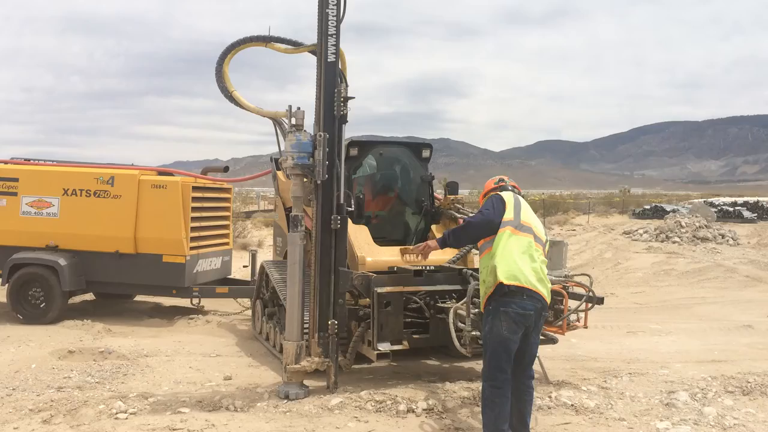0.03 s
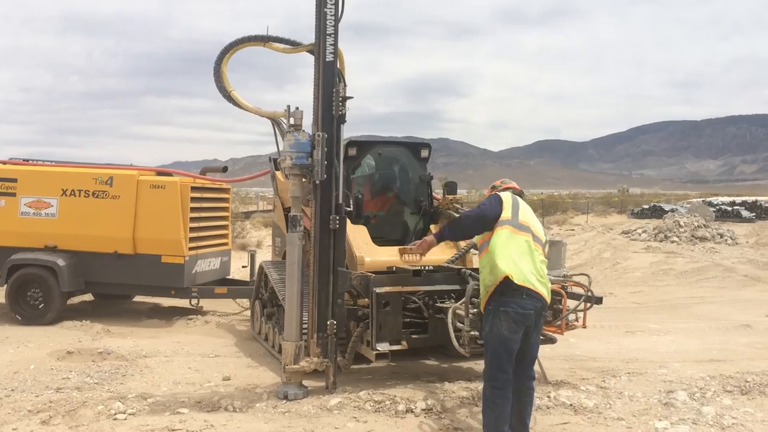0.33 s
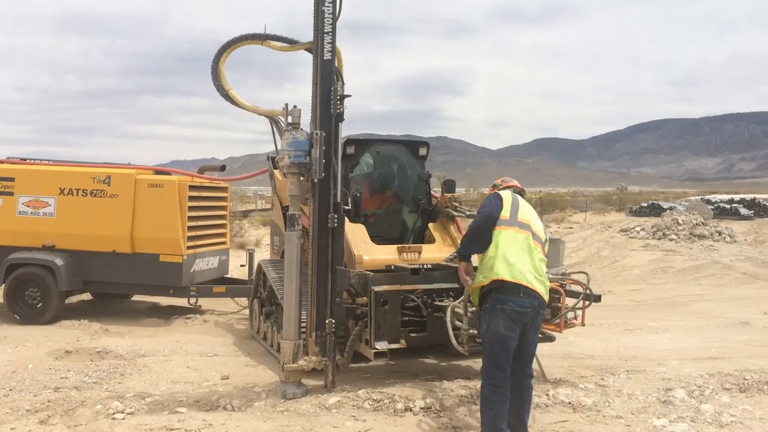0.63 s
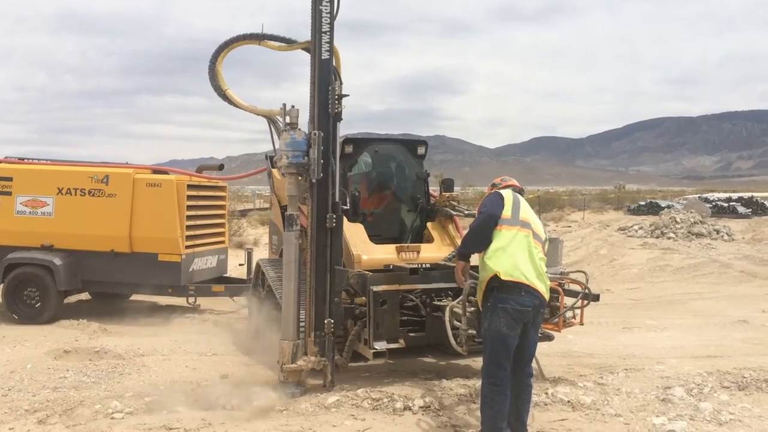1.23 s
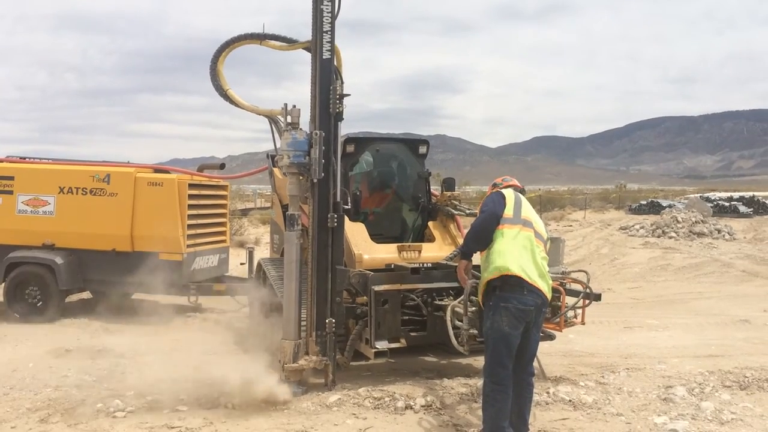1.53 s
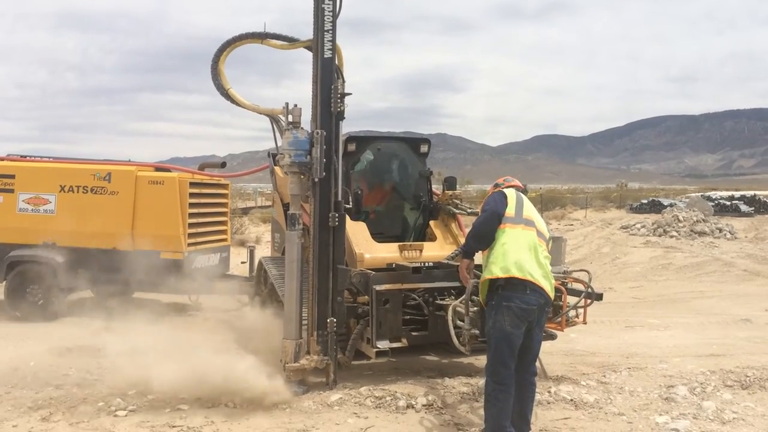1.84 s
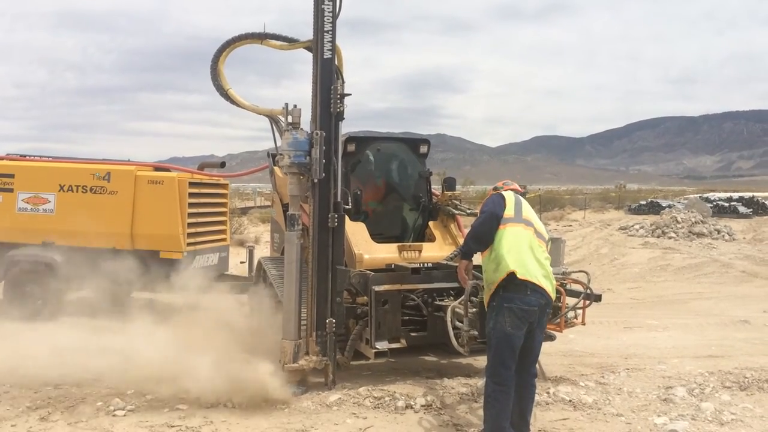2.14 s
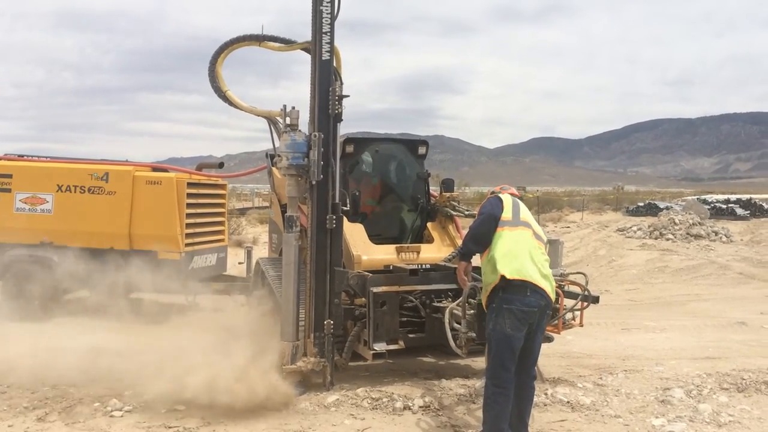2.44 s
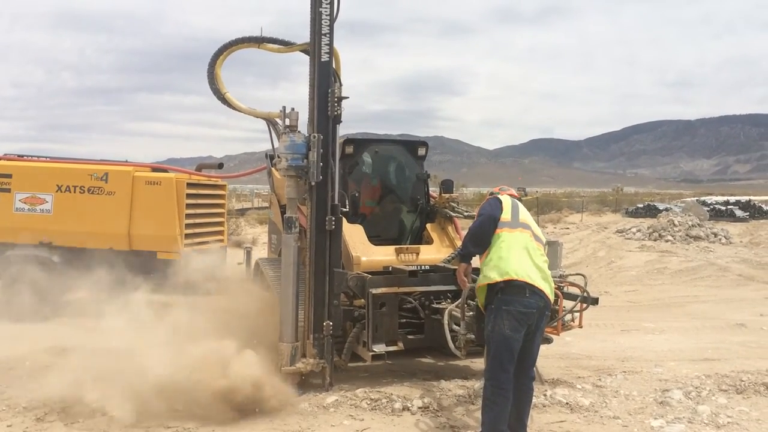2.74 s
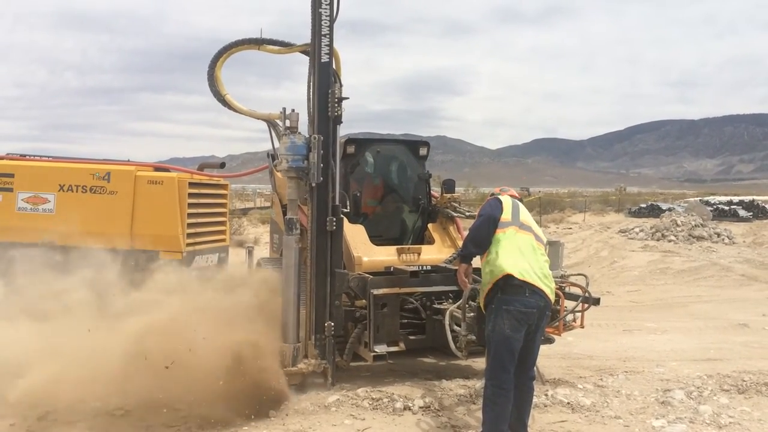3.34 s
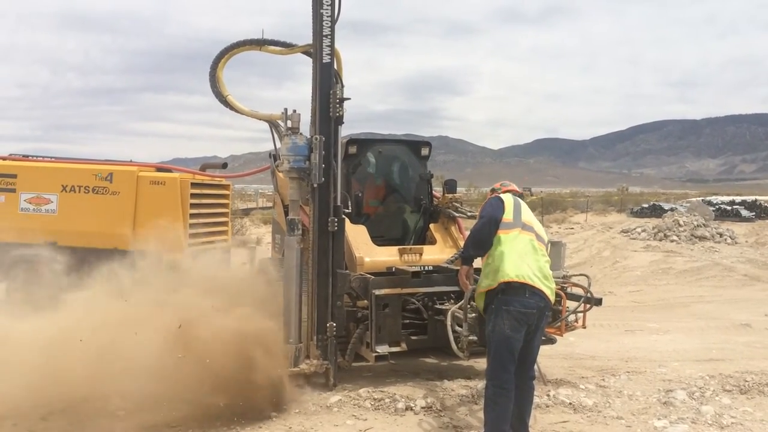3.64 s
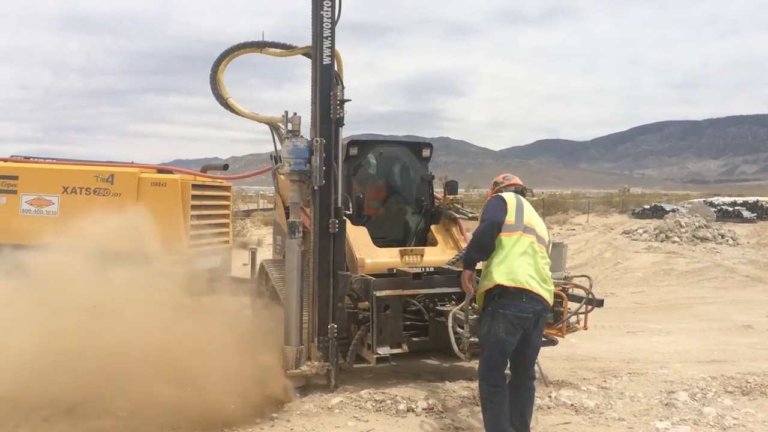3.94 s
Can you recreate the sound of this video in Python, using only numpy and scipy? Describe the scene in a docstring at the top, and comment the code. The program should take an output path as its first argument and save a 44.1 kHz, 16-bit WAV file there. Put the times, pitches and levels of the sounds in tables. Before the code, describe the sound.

A rock drill hammers into open ground over a rumbling diesel compressor. At first air hisses, whistles and bumps softly. Around 0.75 seconds dull blows begin, quickly sharpening with ringing steel. From about 1.2 seconds high squeals and low thumps of air join each stroke. The hammering speeds from eight to nineteen blows a second by 3 seconds, then slows slightly toward 4 seconds as the squeal fades.

```python
"""Air hisses and whistles over an engine's rumble, then a rock drill starts hammering and ringing.
It is a down-the-hole drill on open ground, beside the diesel compressor that feeds it air.
Its piston speeds up from about 8 to 19 blows a second and eases off again.
Each stroke is a spit of air, a blow that rings the steel rod and a knock on the way back.
The air ports squeal, and the used air thumps in the hole, lower in pitch as the bit sinks."""
import sys
import numpy as np
from scipy import signal
from scipy.fft import rfft, irfft
from scipy.io import wavfile

SR = 44100
rng = np.random.default_rng(int(sys.argv[2]) if len(sys.argv) > 2 else 0)


def to_wav(s):
    """Save 16-bit WAV."""
    ch = np.atleast_2d(s).T  # columns
    pcm = np.round(np.clip(ch, -1, 1) * 32767)  # PCM
    wavfile.write(sys.argv[1], SR, pcm.astype(np.int16))


N = 176400


def hammer(blow, blow_db, release, back, spit_db, knock_db):
    """Air spits, the piston cracks the bit into the rock, grit sprays, and the piston knocks back."""
    # tone of the crack and spit, of the grit and of the return knock: f/Hz, relative level/dB
    blow_colour = [(200, -7), (570, -9), (900, 0.5), (1200, -4), (1550, 2), (1920, -7), (2300, -0.5),
                   (2950, -8.5), (3800, -1), (4500, -7), (6500, -6.5), (8300, -7), (9500, -8.5),
                   (12000, -13), (15500, -18)]
    grit_colour = [(150, -7), (350, 0.5), (570, 0), (900, 3.5), (1200, 1.5), (1600, 5), (1950, -5),
                   (2350, -0.5), (2950, -10), (3800, 0), (4600, -9), (6500, -7), (8300, -7.5), (9300, -6),
                   (12000, -13), (15500, -14)]
    knock_colour = [(150, -1.5), (350, 6.5), (570, -7.5), (850, 7), (1200, -5), (1550, 1), (1950, -10.5),
                    (2350, -0.5), (3000, -12.5), (4000, -8.5), (8000, -16), (15500, -40)]
    hits = taps(blow, blow_db)
    crack = bursts(hits, attack_s=0.00013, hold_s=0.0034, decay_s=0.0053) * noise()
    spit = bursts(taps(release, spit_db, scatter_db=1.6), 0.0014, 0.0024, 0.003) * noise()
    grit = bursts(hits, 0.0075, 0.009, 0.019) * noise() * undb(1.1 * wander(900))
    knock = bursts(taps(back, knock_db, scatter_db=0.17), 0.0014, 0.0055, 0.0049) * noise()
    click = bursts(taps(back, spit_db, scatter_db=2.7), 0.0001, 0.00021, 0.00053) * noise()
    return (undb(-9) * colour(crack, blow_colour)
            + undb(-20.5) * colour(spit, blow_colour)
            + undb(-15) * colour(grit, grit_colour)
            + undb(-15.5) * colour(knock, knock_colour)
            + undb(-14) * click)


def steel(blow, blow_db, back, knock_db):
    """The steel rod rings high and long; the casing clanks briefly on the blow and on the return."""
    # ringing notes: f/Hz, relative level/dB, time to fade by 60 dB/s
    rod_notes = [(3779, 1, .22), (4098, 2, .32), (4712, -4, .25), (5039, -7, .2), (7210, -3, .25),
                 (7287, 0, .55), (7398, 0, .45), (8330, 1, .18), (8851, -4, .5), (10255, -8, .25),
                 (10497, -6, .3), (11148, -9, .35), (11286, -8, .4), (11390, -5, .3), (12695, -7, .17),
                 (13312, -10, .3), (14150, -9, .2), (14669, -7, .22)]
    loose_notes = [(4101, -1, .35), (7284, 0, .36)]  # the first full blow finds the rod still loose
    casing_notes = [(914, -6, 0.05), (1435, -2.5, 0.038), (1485, -2.5, 0.027), (1705, 0.5, 0.053),
                    (2180, 3.5, 0.037), (2370, -2, 0.058), (2510, 0, 0.037), (3560, -7, 0.023),
                    (8000, -14, 0.035), (8280, -2.5, 0.061), (11000, -11, 0.045), (12600, -8.5, .06)]
    return_notes = [(633, -3.5, 0.082), (903, -1.5, 0.093), (1410, -30, 0.042), (2205, -14, 0.051)]
    # how strongly the rod, a hollow clank and the return knock ring: t/s, relative level/dB
    rod_strength = [(.75, -18), (.88, -1), (.98, -12), (1.07, 1), (1.45, -3), (2.3, -4), (3.2, -0.5),
                    (4, -5.5)]
    clank_strength = [(.75, 9), (.87, -3), (1.48, -27), (1.55, 9), (1.72, 4.5), (1.88, -1), (2.05, -18),
                      (2.6, 1), (3.2, 3)]
    return_strength = [(1.0, -38), (2.3, -37), (2.8, -16), (4.0, -21)]
    rod_db = blow_db + curve(rod_strength, blow)[0]
    clank_db = blow_db + curve(clank_strength, blow)[0]
    return_db = knock_db + curve(return_strength, back)[0]
    rod = ring(rod_notes, blow, rod_db, scatter_db=5.5, detune_hz=4.5)
    loose = ring(loose_notes, times=[0.98], levels_db=[-18.5], scatter_db=-3, detune_hz=0)
    casing = ring(casing_notes, blow, blow_db, scatter_db=2, detune_hz=18)
    clank = ring([(1000, -15, 0.065)], blow, clank_db, scatter_db=5, detune_hz=17)
    knock = ring(return_notes, back, return_db, scatter_db=-1.5, detune_hz=4.4)
    return undb(-31.5) * rod + loose + undb(-17) * casing + clank + knock


def rig_rattle(x):
    """The rig rings briefly at many high pitches, giving every blow the same tone."""
    decay_s, rattle_db = 0.0035, -5
    t = np.arange(N // 100) / SR
    body = rng.standard_normal(len(t)) * np.exp(-t / decay_s)
    body /= np.sqrt(np.sum(body ** 2))
    body = signal.sosfilt(signal.butter(2, 2650, "high", fs=SR, output="sos"), body)
    rattle = undb(rattle_db) * signal.fftconvolve(x, body)[:N]
    return (x + rattle) / np.sqrt(1 + undb(2 * rattle_db) / 2)


def pressure_build(t, drill):
    """The first blows are dull; the piston strikes more sharply as the air pressure builds."""
    # sharpness of the blows: t/s, share of the treble let through/0-1
    sharpness = [(.75, 0.18), (.88, 0.53), (.98, 0.61), (1.3, 0.87)]
    dull = signal.lfilter(*signal.butter(1, 2780, fs=SR), drill)
    return dull + curve(sharpness, t)[0] * (drill - dull)


def exhaust(blow, release, back, pulse_db, boom_db):
    """Two puffs of used air leave on each stroke; the hole booms at its own pitch and rumbles."""
    # pitch of the hole, falling as the bit sinks: t/s, f/Hz
    hole_pitch = [(1.0, 159), (2.2, 146.8), (3.0, 138.4), (4.0, 135.3)]
    # its higher notes, played 6% lower below: f/Hz, relative level/dB, time to fade by 60 dB/s
    hole_notes = [(333, -14, .09), (455, -19, .06)]
    # tone of its rumble: f/Hz, relative level/dB
    hole_colour = [(30, -29), (75, -15), (135, -4.5), (200, 1.5), (250, -7), (340, 0), (480, -3.5),
                   (580, -13), (1200, -36.5)]
    pulses = puffs(release, pulse_db - 8.5, half_ms=0.81, suction=0.53)
    pulses += puffs(back, pulse_db - 11.5, half_ms=0.87, suction=0.5, scatter=0.25)
    hz = curve(hole_pitch, blow)[0]
    push = blow + 1.31 / hz  # the boom comes 1.31 cycles after the blow
    boom = puffs(push, boom_db - 16.5, half_ms=1.28, suction=0.13)
    boom += ring([(1, -12, 0.083)], push - 1.5 / hz, boom_db, scatter_db=1, detune_hz=3, pitch=hz)
    boom += ring(hole_notes, release, pulse_db, scatter_db=2, detune_hz=3.5, pitch=0.94)
    rumble = bursts(taps(release, (pulse_db + boom_db) / 2), 0.0003, 0.017, 0.022) * noise()
    return pulses + boom + undb(-22) * colour(rumble, hole_colour)


def port_squeal(t, release):
    """The air ports squeal and swoop as the piston opens and shuts them, over a fluttering whistle."""
    # squeal within one stroke: share of the stroke/0-1, f/Hz, relative level/dB
    swoop_shape = [(0, 9900, -18), (.025, 8700, 1.5), (.07, 7830, -6.5), (.16, 8820, -36), (.27, 8000, -2),
                   (.36, 7300, -14), (.56, 7300, -18), (.68, 7700, -25), (.8, 7240, -13), (.9, 7790, -16.5),
                   (.98, 7200, -12)]
    # strength of the squeal: t/s, relative level/dB
    strength = [(.9, -33), (1.06, -14), (1.12, -6), (1.24, 5.5), (1.5, 2), (1.7, 0), (2.25, -1), (2.6, 0.5),
                (4, -18)]
    cycle = np.interp(t, release, np.arange(len(release))) % 1
    cycle += 0.035 * np.sin(np.pi * cycle) * wander(15)  # no two swoops are alike
    hz, db = curve(swoop_shape, cycle)
    swoop = np.sqrt(2) * tone(hz * (1 + 0.024 * wander(1500) + 0.016 * wander(60)))
    swoop *= undb(-21.5 + db + curve(strength, t)[0] + 3 * wander(700))
    whistle = tone(7270 * (1 + 0.01008 * wander(350)))
    whistle *= undb(-37 + 9.6 * np.tanh(wander(120)))
    hammering = (t > release[0]) * (t < release[-1])
    fade_in = np.interp(t, [1.5, 2.4], [0, 1])
    return hammering * swoop + fade_in * whistle


def ground_thuds(t):
    """The bit breaks into the ground with dull thuds, each a low note that swells and quickly fades."""
    # thuds: t/s, f/Hz, level/dB
    thuds = [(0.796, 90, -12), (1.434, 320, -20.5), (1.529, 404, -17.5), (1.543, 480, -21),
             (1.623, 450, -19), (1.663, 161, -12.5), (1.715, 351, -17), (1.746, 343, -21),
             (1.898, 384, -30), (1.968, 100, -8), (2.043, 320, -15), (2.455, 80, -10)]
    rise_s = 0.0057
    out = np.zeros(N)
    for start, hz, db in thuds:
        age = np.maximum(t - start, 0)
        swell = age / rise_s
        out += undb(db) * swell * np.exp(1 - swell) * np.sin(2 * np.pi * hz * age)
    return out * undb(1.5 * wander(300))


def start_up():
    """Air bumps dully and the valve chirps as the pressure comes on."""
    # bumps of air: t/s, level/dB, half width of the puff/ms
    bumps = [(0.188, -19, .4), (.209, -22, .5), (.2995, -13.5, .8), (.5, -22, .9), (.612, -20, .4),
             (0.641, -13, .55)]
    # tone of the rush around each bump: f/Hz, relative level/dB
    rush_colour = [(50, -6), (130, 4), (300, 2.5), (500, 4), (700, -5.5), (1000, -25), (3000, -53)]
    # chirps of the valve: t/s, level/dB
    chirps = [(.712, -29), (0.857, -20), (0.967, -16)]
    times, db, half_ms = np.array(bumps).T
    rush = bursts(taps(times, db - 2), 0.00042, 0.0035, 0.0047) * noise()
    valve_note = tone(2250 * (1 + 0.0514 * wander(830)))
    thumps = puffs(times + 0.00292, db, half_ms, suction=0.25)
    chirp_loudness = bursts(taps(*np.array(chirps).T), 0.0016, 0.0074, 0.0022)
    return colour(rush, rush_colour) + thumps + chirp_loudness * valve_note


def air_line(t):
    """Compressed air rushes along the line, with a breathy two-note whistle until the hammer starts."""
    # the whistle's lower note: t/s, f/Hz, level/dB
    whistle = [(.12, 3620, -36), (.3, 3620, -45.5), (.5, 3680, -33.5), (.56, 3630, -38), (.85, 3530, -39),
               (1.0, 3620, -65)]
    # tone of the rushing air: f/Hz, relative level/dB
    rush_colour = [(100, 14.5), (400, 6), (900, -0.5), (1800, -4.5), (3500, -4), (5000, -13), (7500, -11.5),
                   (10000, -10.5), (15500, -25)]
    # its loudness: t/s, level/dB
    rush_level = [(.12, -46), (.35, -38.5), (.55, -33.5), (.73, -29), (.79, -23.5), (.83, -35), (.9, -24),
                  (.95, -30.5), (1.2, -37), (2.4, -31), (2.8, -27.5), (3.2, -31), (4, -37)]
    hz, db = curve(whistle, t)
    low = tone(hz * (1 + 0.021 * wander(1200) + 0.009 * wander(41))) * undb(4.2 * wander(70))
    high = tone(9500 * (1 + 0.0234 * wander(2500))) * undb(-8 + 3.2 * wander(300))
    rush = colour(noise(), rush_colour) * undb(curve(rush_level, t)[0] + 1.98 * wander(24.98))
    return rush + undb(db) * (low + high)


def compressor(t):
    """The diesel engine drones on a low note and its octave, under a rough rumble."""
    # tone of the rumble: f/Hz, relative level/dB
    rumble_colour = [(20, -10), (40, -21), (60, 4.5), (85, -1), (130, -1.5), (200, -6.5), (350, -19.5),
                     (700, -21.5), (1500, -25), (3000, -40), (6000, -41), (15000, -49)]
    # its loudness: t/s, level/dB
    rumble_level = [(.12, -27), (.45, -29.5), (.52, -24.5), (.8, -24.5), (.92, -32), (1.5, -24),
                    (1.96, -24), (2.2, -32), (2.5, -26), (4, -25.5)]
    engine_hz = 64.9 * (1 + 0.017 * wander(14.04))
    drone = undb(-42.5) * (tone(engine_hz) + 1.66 * tone(2 * engine_hz))
    rumble = colour(noise(), rumble_colour) * undb(curve(rumble_level, t)[0] + 2 * wander(18))
    return drone + rumble


def undb(db):
    """Turn decibels into a number to multiply a sound by."""
    return 10 ** (np.asarray(db) / 20)


def curve(table, at):
    """Join a table's rows with straight lines and read the later columns at places along the first."""
    rows = np.array(table, float)
    return [np.interp(at, rows[:, 0], col) for col in rows.T[1:]]


def tone(hz):
    """A pure note that follows a changing pitch."""
    return np.sin(2 * np.pi * np.cumsum(hz) / SR)


def noise():
    """An even hiss (white noise)."""
    return rng.standard_normal(N)


def wander(rate):
    """A random drift of about 1 either way, heading for a new value `rate` times a second."""
    points = rng.standard_normal(N // 10)
    return 1.2 * np.interp(np.arange(N) / SR * rate, np.arange(len(points)), points)


def colour(x, points):
    """Make some pitches stronger and others weaker; an even hiss keeps its overall power."""
    hz, db = np.array(points, float).T
    f = np.maximum(np.arange(N + 1) * SR / (2 * N), 1)
    gain = undb(np.interp(np.log(f), np.log(hz), db))
    cepstrum = irfft(np.log(gain / np.sqrt(np.mean(gain ** 2))))
    cepstrum[1:N] *= 2  # folded so that the filter rings only after a hit, never before
    cepstrum[N + 1:] = 0
    return irfft(rfft(x, 2 * N) * np.exp(rfft(cepstrum)))[:N]


def taps(times, db, scatter_db=0):
    """One spike per event; scatter_db makes each stronger or weaker by chance."""
    out = np.zeros(N)
    size = undb(db + scatter_db * rng.standard_normal(len(times)))
    at = (times * SR).astype(int)
    np.add.at(out, at[at < N], size[at < N])
    return out


def bursts(hits, attack_s, hold_s, decay_s):
    """A loudness shape that rises, holds and fades after every spike."""
    t = np.arange(N // 16) / SR
    shape = (1 - np.exp(-t / attack_s)) * np.exp(-np.maximum(t - hold_s, 0) / decay_s)
    return signal.fftconvolve(hits, shape)[:N]


def puffs(times, db, half_ms, suction, scatter=0.06):
    """Puffs of air: the pressure rises, then dips further; size and width vary by chance."""
    t, out = np.arange(N) / SR, np.zeros(N)
    chance = rng.standard_normal((len(times), 2))
    widths = half_ms * np.ones(len(times)) / 1000
    for start, size, width, (wider, louder) in zip(times, undb(db), widths, chance):
        at = int(start * SR)
        near = slice(max(at - N // 200, 0), at + N // 200)
        u = (t[near] - start) / (width * np.exp(scatter * wider))  # time in half widths
        shape = (u + suction * (1 - u ** 2)) * np.exp((1 - u ** 2) / 2)
        out[near] -= size * np.exp(scatter * louder) * shape
    return out


def ring(notes, times, levels_db, scatter_db, detune_hz, pitch=1):
    """Notes ring on from hit to hit, each hit favouring different ones and shifting their pitch a bit."""
    out = np.zeros(2 * N)
    for hz, db, fade_s in notes:
        t = np.arange(int(np.clip(fade_s, 0.005, 1) * SR)) / SR
        fade = np.exp(-np.log(1000) * t / fade_s)
        chance = rng.standard_normal((len(times), 2))
        pitches = hz * pitch * np.ones(len(times))
        for start, level, f, (louder, higher) in zip(times, levels_db, pitches, chance):
            at = int(start * SR)
            note = np.sin(2 * np.pi * (f + detune_hz * higher) * t)
            out[at:at + len(t)] += undb(db + level + scatter_db * louder) * fade * note
    return out[:N]


def scene():
    """The piston's strokes time the hammer, steel, exhaust and squeal; the other sounds join them."""
    # piston blows: t/s, relative level/dB
    blows = [(0.7457, -7), (0.8744, -5), (0.9797, -1), (1.0725, -3), (1.1598, -6), (1.2446, -5),
             (1.3269, -4), (1.4082, -3), (1.4875, -4), (1.5673, -5), (1.6432, -4), (1.72, -5), (1.7953, -5),
             (1.8721, -4), (1.9475, -1), (2.0213, -3), (2.0946, -2), (2.169, -3), (2.2403, -5),
             (2.3104, -6), (2.3774, -5), (2.4369, -7), (2.4977, -9), (2.5551, -7), (2.6115, -6),
             (2.6663, -6), (2.7212, -7), (2.7746, -5), (2.829, -5), (2.8823, -5), (2.9352, -7),
             (2.9901, -6), (3.043, -5), (3.0949, -7), (3.1477, -8), (3.2006, -5), (3.254, -7), (3.3079, -7),
             (3.3638, -8), (3.4191, -6), (3.474, -10), (3.5324, -7), (3.5897, -8), (3.6476, -5),
             (3.706, -3), (3.7688, -5), (3.8332, -7), (3.904, -4), (3.9779, -4)]
    # timing of a stroke: t/s, air release before the blow/ms, return knock after it/ms
    timing = [(.75, 22, 54), (.874, 13, 45), (.98, 12, 37), (1.16, 10.54, 30), (1.5, 9.1, 27.1),
              (2.1, 5.7, 25), (2.37, 5.34, 20.4), (2.7, 3.56, 21.2), (3.1, 3.5, 17.34), (3.48, 5.7, 16.4),
              (3.77, 5.9, 18.8), (3.98, 10.5, 31.7)]
    # relative strength of its parts: t/s, spit/dB, exhaust puff/dB, boom/dB, return knock/dB
    strengths = [(.75, -28, -37, -22, -4.5), (.88, 3, -34, -33, 0.5), (.98, 6, -48, -41, -2.5),
                 (1.25, 6, -10.5, -1.5, -2.5), (2.1, 0, -18, -0.5, -0.5), (2.4, 5.5, -4, 0, 1),
                 (2.7, 5, -3.5, 2, -1.5), (3.0, 0, 1, 1.5, -2), (3.55, -3, 2.5, -2, -0.5),
                 (3.98, -6, -0.5, -1.5, -1)]
    t = np.arange(N) / SR
    blow, blow_db = np.array(blows).T
    lead_ms, return_ms = curve(timing, blow)
    release, back = blow - lead_ms / 1000, blow + return_ms / 1000
    spit_db, pulse_db, boom_db, knock_db = curve(strengths, blow)
    drill = rig_rattle(hammer(blow, blow_db, release, back, spit_db, knock_db))
    drill += steel(blow, blow_db, back, knock_db)
    air = exhaust(blow, release, back, pulse_db, boom_db) + port_squeal(t, release) + air_line(t)
    return (pressure_build(t, drill) + air + compressor(t) + start_up() + ground_thuds(t))[None]


def record(dry):
    """The sound cuts in, the deepest rumble is thinned, loud peaks are rounded and the top is cut."""
    start_s, low_cut_hz, top_hz = 0.1196, 68, 15300
    opened = np.clip((np.arange(N) / SR - start_s) / 0.00066, undb(-71), 1)
    thinned = signal.sosfilt(signal.butter(1, low_cut_hz, "high", fs=SR, output="sos"), dry)
    rounded = 0.8 * np.tanh(thinned * opened / 0.75)
    return signal.sosfilt(signal.ellip(10, 0.2, 80, top_hz, fs=SR, output="sos"), rounded)


dry = scene()
out = record(dry)
to_wav(out)
```